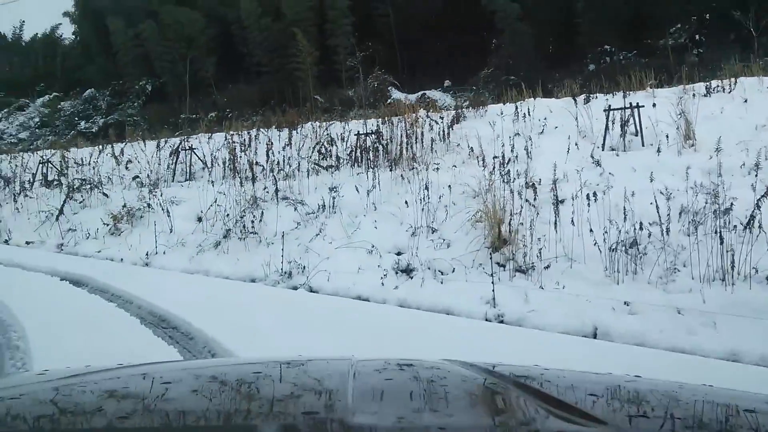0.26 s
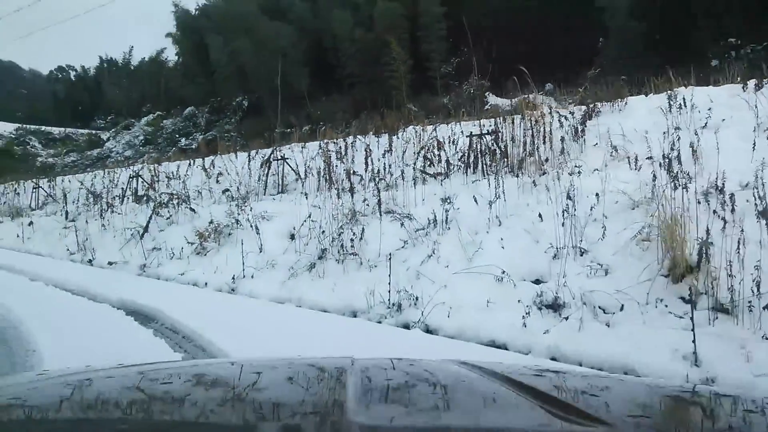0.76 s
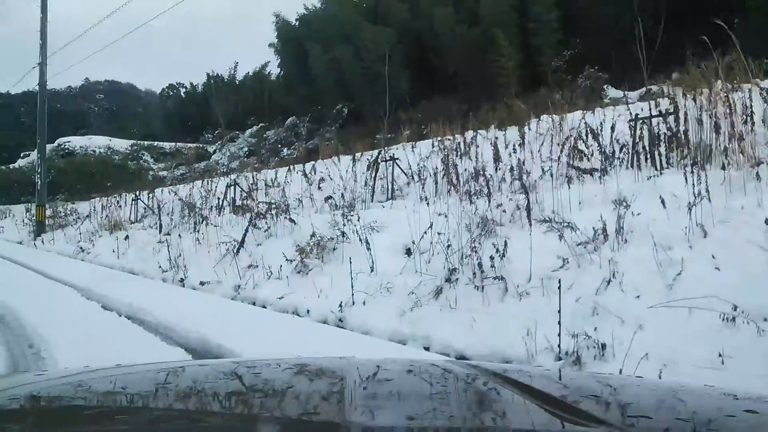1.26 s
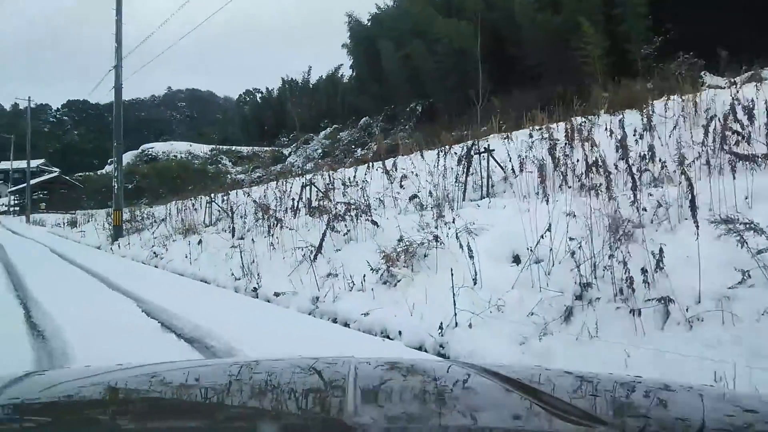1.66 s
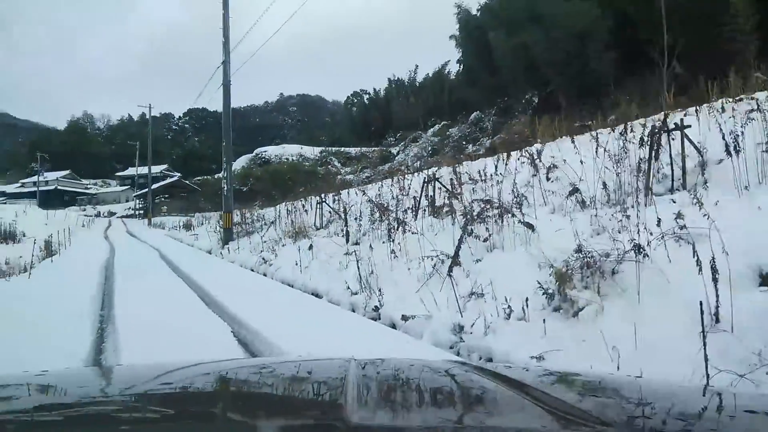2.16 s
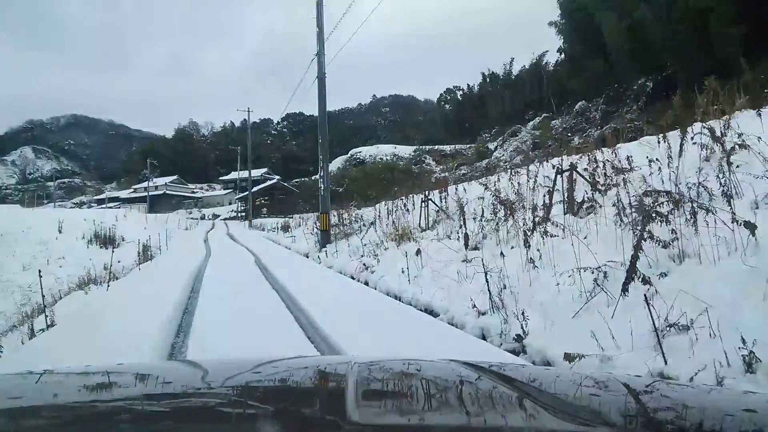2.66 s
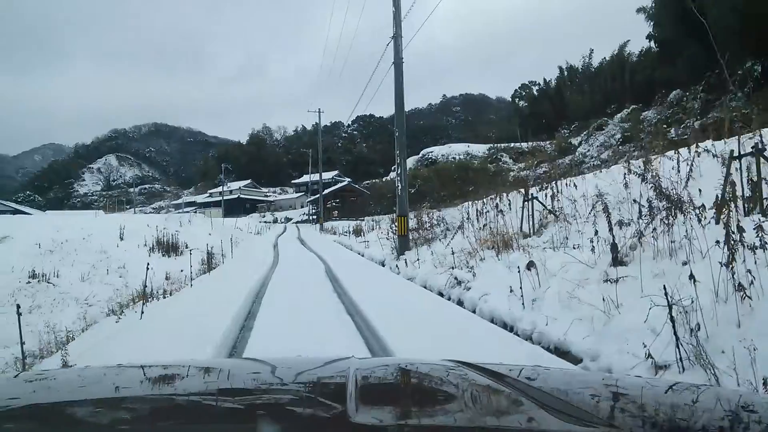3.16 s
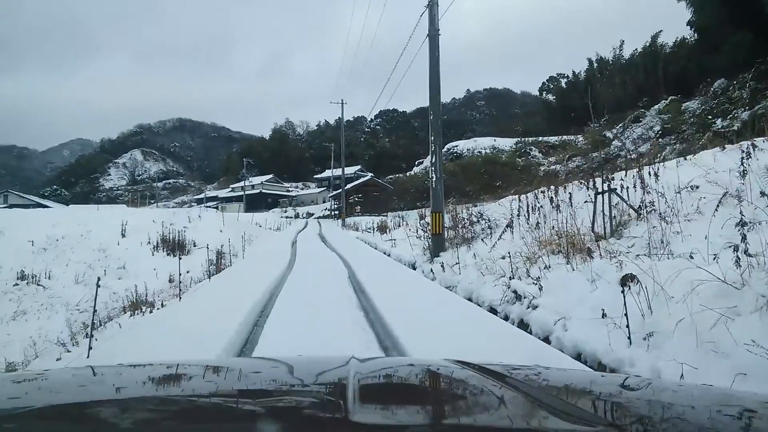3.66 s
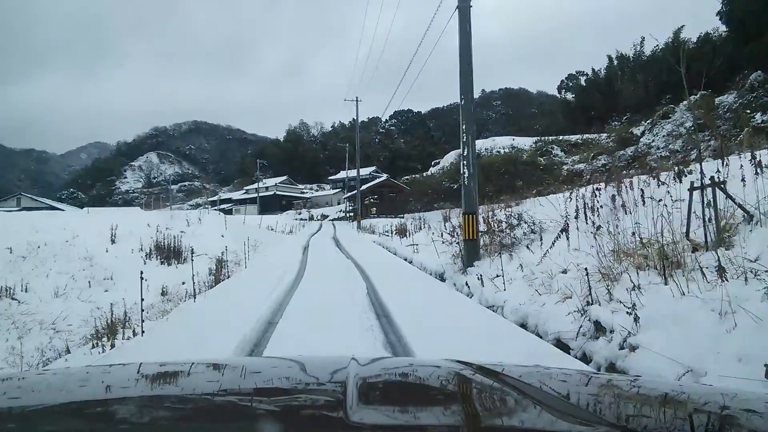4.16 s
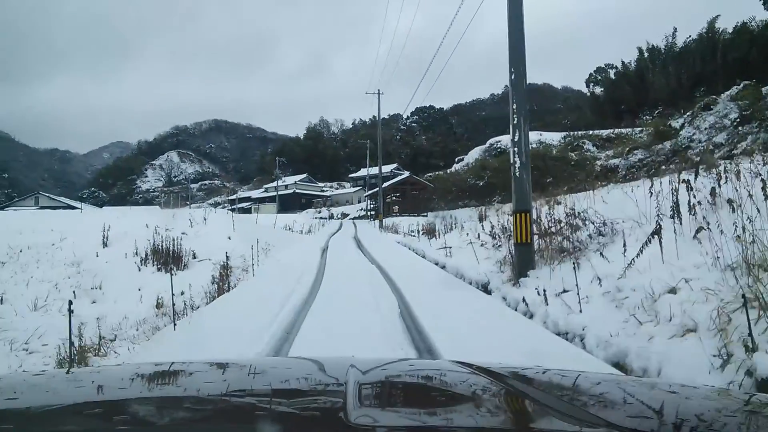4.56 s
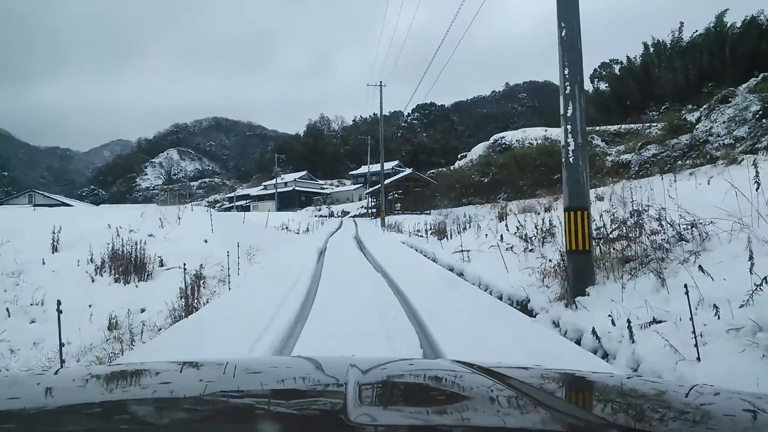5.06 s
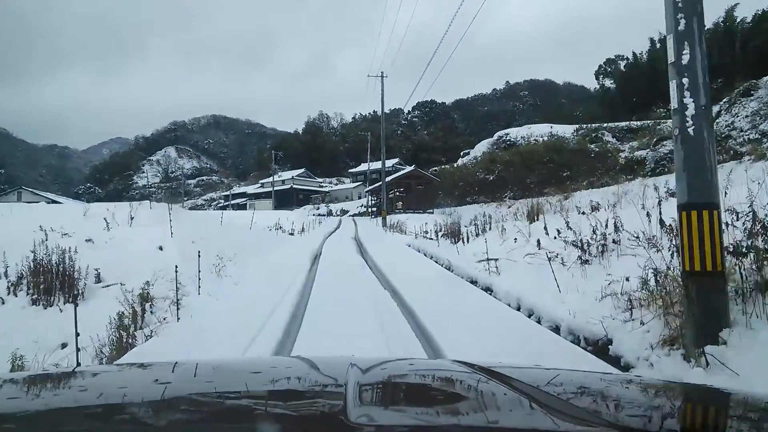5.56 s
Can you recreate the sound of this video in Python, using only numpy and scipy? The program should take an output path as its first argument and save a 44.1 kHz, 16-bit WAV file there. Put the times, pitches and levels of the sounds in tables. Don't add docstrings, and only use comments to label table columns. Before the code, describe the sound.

Dashboard-level cabin sound: boomy engine hum, soft tyre rumble on snow, muffled lumps knocking below, plastic creaks, and revs climbing at the end.

```python
import sys
import numpy as np
from scipy import signal
from scipy.fft import rfft, irfft, next_fast_len
from scipy.io import wavfile
from scipy.ndimage import uniform_filter1d, map_coordinates

SR = 44100
rng = np.random.default_rng(int(sys.argv[2]) if len(sys.argv) > 2 else 0)


def volts_from_db(level):
    exponent = np.asarray(level, float) / 20
    return 10 ** exponent


def master(y):
    cut = np.clip(np.atleast_2d(y).T, -1, 1)
    pcm = np.round(cut * 32767)
    wavfile.write(sys.argv[1], SR, pcm.astype(np.int16))


N = 255780
TIME_S = np.arange(N) / SR

# t/s, f/Hz
SHAFT = [(0.0, 15.91), (0.44, 15.97), (0.58, 16.19), (0.87, 16.03), (1.16, 16.37), (1.45, 16.3),
         (1.74, 16.47), (2.32, 16.99), (2.9, 18.09), (3.05, 18.37), (3.34, 18.0), (3.77, 18.31),
         (4.21, 18.7), (4.35, 18.29), (4.79, 18.81), (5.08, 19.38), (5.37, 19.83), (5.8, 20.77)]
IDLE_HZ = 16
# t/s, level/dB re full
LOAD = [(0.0, -19.5), (0.3, -14.5), (0.6, -8.5), (0.9, -4), (1.6, -3), (2.3, -6), (2.8, -11), (3.6, -11.5),
        (4.2, -9.5), (4.5, -15), (5.0, -3.5), (5.4, 1.5), (5.8, 4)]
# t/s, lead/rad
WINDUP = [(0, 2.19), (.3, 1.704), (.6, 1.08), (1.0, 0.58), (1.4, 0.11), (1.8, -0.487), (2.2, 1.11),
          (2.6, 0.64), (3.0, 0.71), (3.5, 0.243), (4.2, 0.366), (4.6, 0.285), (5.0, -0.864), (5.4, -0.46),
          (5.8, -0.48)]

STRONG_ORDERS = [8, 13, 18, 21, 22, 23, 24, 25, 26, 27, 48, 56]
STRONG_DB = [-53, -51.5, -57.5, -61.5, -60.5, -66.5, -58.5, -70, -59, -55, -66.5, -65.5]
STRONG_FOLLOWS = [.3, 1, 1, .7, .7, 1, 1, 1, .8, .85, 1, 1]
STRONG_RAD = [0, 1, 2.4, 0, 2, 0, 5, 3.2, 1.2, 5.1, 0, 0]
STRONG_SLIDES = [0, 0, 0, 3.4, 4, 4, 1.5, .6, .6, -2.5, 0, 0]
STIFF_HZ, SHAKE_RAD, FLUTTER_DB = 1.7, .25, 1.8
UNEVEN, UNEVEN_RAD = .2, 1.6
# f/Hz, width/Hz, level/dB
BODY = [(132, 16.2, 10.5), (234.26, 11.95, 20.5), (350.2, 52.4, 19), (423.13, 46.34, 29), (1007, 228, 16)]
# t/s, half length/s, lowest order loss/dB, gear gain/dB
SLACK = [
    (0.367, 0.148, 23.5, -4.5),
    (0.271, 0.079, 1.5, 35.5),
    (1.35, 0.234, 4.5, -3),
    (1.858, 0.0283, 11, -6),
    (3.584, 0.2, 22, 11.5),
    (4.44, 0.29, 24, 1.5),
]
SHIFT_ORDERS = [27, 26, 25, 25, 24, 27, 24, 8, 8, 56, 48, 26, 13, 18, 48, 13, 23]
# t/s, half length/s, level/dB
SHIFTS = [(0.086, 0.183, -7.5), (1.957, 0.27, -9), (2.2, 0.28, 9), (3.4, .3, -2), (3.446, 0.228, -9.5),
          (3.63, 0.214, -13.5), (5.417, 0.33, -0.5), (1.494, 0.033, 3.5), (1.691, 0.046, -7),
          (5.716, 0.275, -16), (5.36, 0.096, -17), (0.232, 0.082, -8.5), (3.54, 0.65, -1.5),
          (5.25, 0.13, -5.5), (4.98, 0.125, 9.5), (4.44, 0.31, 3.5), (3.09, 0.163, 6)]

WEAK_ORDERS = [5, 6, 10, 11, 12, 14, 15, 16, 17, 19, 20, 29, 30, 31, 32]
WEAK_DB = [10.5, 1, 5, 9.5, 7, 4.5, 8, 7.5, 8.5, -2, 5, -6, 1, 1, 6.5]
GEAR_ORDERS = [37, 40, 50, 51, 53, 54, 60, 64]
GEAR_DB = [10.5, -4.5, 13, -17, -9, 11, -13.5, -19]
DRIFT_DB, DRIFT_RAD = 4.5, .9
DRONE_DB, DRONE_FOLLOWS = -30, 0.5744
NOISY_DB, NOISY_FOLLOWS, NOISY_TOP_DB = -3.5, -.62, 2
KNOCK_RAD, KNOCK_RAD_PER_HZ = 2.2, .38
DEEP_DB, DEEP_PEAK_DB, DEEP_AT_HZ, DEEP_WIDTH_HZ, DEEP_WAKES_HZ = -11.5, 13.5, 2.107, 4.7, 1.91
# f/Hz, width/Hz, level/dB
CABIN = [(146.4, 25.26, 11.5), (219.6, 12, -7), (350.4, 26.4, 1.5), (423.34, 22.4, 9.5), (441.1, 31.3, 16),
         (548.5, 110.3, 4), (758, 14, -3), (945.5, 81.6, 1), (1366.8, 48.8, 12.5), (1596, 76.5, 2),
         (1878, 177, -0.5), (2633, 176.6, 6.5)]
# f/Hz, level/dB
BULKHEAD = [(40, -21.5), (100, -18.5), (200, -2.5), (400, -1), (700, -11), (1200, -18.5), (2000, -28),
            (3300, -44.5), (6000, -49)]

# f/Hz, level/(dB per Hz)
RUMBLE = [(12, -52.5), (20, 1.5), (96, 2), (115, 5), (150, -30.5), (250, -120)]
RUMBLE_DB, RUMBLE_SWING_DB = -62.5, 2.5
# t/s, peak level/dB, half length/s
RUTS = [(0, -47, 0.069), (0.637, -46, 0.06), (0.784, -44, 0.0354), (1.072, -48, 0.13), (1.478, -47, 0.055),
        (1.942, -50, 0.15), (2.213, -43.5, 0.118), (2.5, -46.5, 0.187), (2.673, -44, 0.103),
        (2.834, -61, .06), (3.05, -48, 0.108), (3.24, -50, 0.124), (3.87, -57.5, 0.12), (4.146, -53, 0.054),
        (4.6, -58.5, 0.086), (5.1, -49.5, 0.067), (5.305, -49.5, 0.066), (5.703, -49.5, 0.118)]
# f/Hz, level/(dB per Hz)
TREAD = [(450, -24.5), (700, 3.5), (1500, 5.0), (3500, 7.5), (5000, -4.0)]
CRUNCH_DB, CRUNCH_DB_PER_HZ, CRUNCH_SWING_DB, TREAD_PATCHY_DB = -45, 1.1621, .9, 1.4
# f/Hz, level/(dB per Hz)
SLUSH = [(1470, -20.5), (2500, 0), (2720, -6.5), (3270, -10.5), (4250, -4.5), (4660, -10), (6740, -7),
         (9240, -5), (15700, -4.5)]
# t/s, peak level/dB, rise/s, fall to -10 dB/s
SPRAYS = [(0, -64.5, .1, 0.13), (.55, -66.5, 0.28, 0.8), (.8, -61, 0.066, 0.0856), (1.57, -66.5, .12, 0.36),
          (1.92, -63, 0.068, 0.18), (2.3, -67, 0.21, -0.6), (2.8, -53.5, 0.268, 0.34),
          (3.12, -56.5, 0.067, 0.75), (3.43, -49.5, 0.155, 0.2), (3.8, -62, .15, -0.97),
          (4.08, -61.5, 0.18, 0.54), (4.56, -56, .06, 0.25), (4.74, -46.5, 0.115, 0.21),
          (4.88, -60.5, 0.085, 0.34), (5.17, -60.5, 0.11, -0.09), (5.55, -56.5, 0.1, -0.03),
          (5.8, -56, 0.226, .1)]
DAMP_DB, WET_DB, WET_FROM_S = -79, -66.5, 2.46
# f/Hz, level/(dB per Hz)
FAN = [(1470, -33.5), (2500, -39.5), (2660, -14), (3380, -27), (3620, -4), (4490, -12.5), (5200, -8),
       (5840, -4.5), (6820, -23.5), (14300, -10), (15800, -19.5)]
FAN_DB, FAN_PATCHY_DB = -70, 1.6
# f/Hz, level/dB
WHISTLES = [
    (5923, -86),
    (8922, -86),
    (9890, -83),
]

# t/s, peak level/dB, ring f/Hz
LUMPS = [(.041, -27, 433.6), (.129, -31, 327), (.248, -32, 449), (.39, -31.5, 331.5), (.451, -22.5, 418.8),
         (.581, -37.5, 441), (4.938, -22, 407.6), (5.2, -31, 411), (2.642, -26, 432), (2.923, -36.5, 434),
         (3.035, -42, 430), (3.314, -21, 440), (3.421, -33.5, 434), (3.531, -25.5, 430),
         (3.641, -21.5, 427.5), (3.752, -29, 437), (3.859, -27, 422), (4.13, -28.5, 367.3),
         (4.184, -22, 447), (4.4, -25.5, 380.6), (4.508, -27, 426), (4.564, -38, 455), (4.715, -18, 435.7),
         (4.778, -20, 407.6), (4.83, -31, 418), (4.883, -38, 402)]
# t/s, peak level/dB, ring f/Hz
CRUST = [(0.177, -32, 974), (0.232, -38.5, 785), (0.5, -26, 600), (0.572, -25.5, 579), (1.067, -27.5, 610),
         (1.193, -30, 596), (1.241, -24.5, 590), (1.342, -28.5, 610.6), (1.473, -33.5, 573),
         (1.83, -21, 583), (1.883, -30, 639), (1.988, -39, 575), (2.045, -30.5, 595), (2.342, -42.5, 980),
         (2.431, -42, 750), (2.52, -26, 672), (2.874, -23, 607), (2.983, -28.5, 928), (3.311, -33, 759),
         (3.405, -27, 591), (3.517, -36.5, 605), (3.804, -26.5, 667), (3.942, -28, 719),
         (4.043, -19.5, 577.4), (4.103, -28, 750), (4.17, -30, 1206), (4.206, -30, 737),
         (4.22, -31.5, 1220), (4.291, -34.5, 741), (4.367, -33.5, 719), (4.515, -38, 1362),
         (4.574, -28, 1360), (4.695, -21.5, 746), (4.874, -26.5, 1390), (4.964, -23.5, 937),
         (5.065, -32, 930), (5.12, -26.5, 932), (5.266, -33, 730), (5.378, -37, 723), (5.465, -24, 591),
         (5.521, -31.5, 564)]
# t/s, peak level/dB, ring f/Hz
THUDS = [(0.14, -33.5, 317.7), (0.229, -42, 303.4), (0.309, -41.5, 212), (0.372, -36, 214),
         (1.53, -28, 286.2), (1.882, -29.5, 213.6), (1.999, -34.5, 271.4), (2.178, -35.5, 232.3),
         (2.552, -30.5, 238.7), (2.829, -25.5, 227.5), (2.996, -33.5, 236), (3.159, -28, 228.9),
         (3.431, -24, 235), (3.518, -35, 237.6), (3.602, -32.5, 236.4), (4.088, -30.5, 234),
         (4.251, -28, 276.6), (4.419, -34.5, 291), (4.556, -30, 247.6), (4.659, -34.5, 251),
         (5.002, -29.5, 247.8), (5.092, -26.5, 242.9), (5.453, -25.5, 256.4)]
LUMP_T60_S, CRUST_T60_S, THUD_T60_S, SOFT_S = 0.0417, 0.0356, 0.0873, .011
LUMP_DB, CRUST_DB, THUD_DB = 0, -4, -6

# t/s, peak level/dB, f/Hz, t60/s
CHIRPS = [
    (0.269, -62, 2280, .03),
    (4.428, -54, 2000, .03),
    (3.68, -55, 5350, 0.057),
    (3.7517, -50.5, 5340, 0.068),
]
# t/s, dull level/dB, bright level/dB, ring f/Hz
TICKS = [(0.2706, -50, -77.5, 4753), (0.467, -57, -65, 3180), (0.522, -54.5, -73.5, 3690),
         (0.794, -60.5, -58.5, 2960), (1.064, -64.5, -56.5, 2960), (2.4625, -52.5, -52, 2920),
         (3.04, -53, -50.5, 5450), (3.619, -48.5, -40.5, 2820), (3.6759, -66.5, -48.5, 5330),
         (3.749, -57.5, -41.5, 5210), (3.8693, -58.5, -54.5, 4560), (3.912, -48, -50, 2924),
         (3.9317, -66.5, -64, 2980), (4.2462, -42, -42, 3430), (4.2866, -63, -44.5, 3400),
         (4.515, -48, -48, 3057), (4.8262, -51, -41, 3590), (4.8658, -52, -44, 3540),
         (4.9215, -67.5, -49.5, 3220), (5.085, -56, -54.5, 2980), (5.1102, -47, -43.5, 3307),
         (5.1363, -53, -55, 3000), (5.4417, -48, -39.5, 4703), (5.493, -56, -43, 3010),
         (5.7217, -52.5, -49.5, 4580), (5.76, -57, -60, 4380)]
TICK_T60_S, TICK_T60_S_PER_DB = .062, .0012
# t/s, dull level/dB, bright level/dB
SNAPS = [
    (0.9936, -53, -53.5),
    (1.872, -48, -64.5),
    (2.569, -54, -63.5),
    (2.6583, -44, -49),
    (2.7041, -40, -60.5),
    (2.7458, -53.5, -57.5),
    (2.798, -50, -51.5),
    (4.4849, -48.5, -58.5),
    (4.742, -42.5, -34.5),
]
SNAP_HZ, SNAP_T60_S = 4454, 0.0223
# f/Hz, width/Hz, level/dB
TRIM = [(2806, 350, 8), (3542, 350, 6.5), (4694, 620, 8.5), (5815, 300, 0)]
# f/Hz, level/dB
DULL = [(1400, -38.0), (2400, 5.0), (3500, 2.5), (6000, 1.5), (8000, -13.5)]
# f/Hz, level/dB
BRIGHT = [(5000, -11.0), (8000, 0.5), (11000, -2.5), (15000, -8.0)]
# t/s, peak level/dB, centre f/Hz
CRACKS = [(3.6785, -37.5, 9220), (3.7517, -27, 11170), (3.9135, -41, 14520), (4.2477, -33.5, 8820),
          (4.2892, -35, 10020), (4.5166, -34.5, 14200), (4.8678, -37, 7860), (4.923, -30.5, 11470),
          (5.1146, -33.5, 14260), (5.445, -30.5, 9100), (5.4966, -36.5, 7690), (5.7224, -41.5, 13010)]
CRACK_T60_S, CRACK_WIDTH_HZ, CRACK_DB = 0.0284, 1300, -4.5
# t/s, peak level/dB, centre f/Hz
CLACKS = [(0.2713, -40, 4700), (2.4654, -45.5, 2985), (2.6586, -38, 4573), (2.7055, -42.5, 4560),
          (2.7437, -41.5, 4580), (3.041, -48, 4680), (3.6197, -39.5, 3882), (3.915, -34.5, 3267),
          (4.2476, -41.5, 3430), (4.249, -31.5, 5068), (4.5166, -39.5, 2997), (5.112, -43, 4410),
          (4.8263, -39, 3554), (4.8693, -35.5, 3490), (5.445, -41, 4730), (5.7224, -41.5, 4840)]
CLACK_T60_S, CLACK_WIDTH_HZ, CLACK_DB = 0.0427, 730, -5.5

# t/s, peak level/dB
BUMPS = [
    (.8195, -14.5),
    (4.015, -28),
    (4.183, -24),
]
# f/Hz, level/dB, t60/s
DASH = [(300, -14, .06), (422, -3.5, .07), (570, -5, .055), (800, -13, .05), (1010, -12, .05),
        (1220, -14, .05), (1500, -15, .04), (1720, -20, .035)]
# t/s, f/Hz, level/dB
PUMP = [
    (3.7, 698, -73.5),
    (4.0, 708, -48),
    (4.2, 727.6, -39.5),
    (4.45, 722.3, -47),
    (4.55, 741, -46),
    (4.7, 738.3, -39),
    (4.85, 758, -57),
    (5.0, 779, -43.5),
    (5.22, 789.7, -49.5),
    (5.35, 800, -74),
]
TOP_HZ = 15830


def unit(x):
    return x / np.sqrt(np.mean(x ** 2) + 1e-20)


def along(points, hz):
    f, v = np.transpose(points)
    return np.interp(np.log(hz + 1), np.log(f + 1), v)


def curves(rows):
    s, *cols = np.transpose(rows)
    return [np.interp(TIME_S, s, c) for c in cols]


def wobble(rate_hz):
    coarse = np.arange(0, N + 32, 32)
    knots = rng.standard_normal(int(N * rate_hz / SR) + 4)
    return np.interp(np.arange(N), coarse, map_coordinates(knots, [coarse * rate_hz / SR]))


def phase(hz):
    return 2 * np.pi * np.cumsum(hz) / SR


def filtered(x, response):
    m = next_fast_len(N + SR // 2)
    return irfft(rfft(x, m) * response(np.fft.rfftfreq(m, 1 / SR)), m)[:N]


def patchy(x, depth_db, window=256, bins=5, frames=4):
    z = signal.stft(x, nperseg=window)[2]
    field = uniform_filter1d(rng.standard_normal(z.shape), bins, axis=0)
    field = uniform_filter1d(field, frames, axis=1)
    return signal.istft(z * volts_from_db(depth_db * unit(field)), nperseg=window)[1][:N]


def noise(spectrum, patchy_db):
    flat = patchy(rng.standard_normal(N + 512), patchy_db, 512, 6, 14)
    return unit(filtered(flat, lambda f: volts_from_db(along(spectrum, f))))


def swells(rows, order):
    power = 0
    for s, db, rise_s, fall_s in rows:
        away = np.maximum((s - TIME_S) / abs(rise_s), (TIME_S - s) / abs(fall_s))
        power = power + volts_from_db(2 * db - 20 * away ** order)
    return np.sqrt(power)


def add_at(out, s, sound):
    out[round(s * SR):][:len(sound)] += sound


def resonances(f, modes):
    return sum(volts_from_db(db) * 1j * f * w / (c * c - f * f + 1j * f * w) for c, w, db in modes)


def cabin(f):
    return volts_from_db(along(BULKHEAD, f)) * (1 + resonances(f, CABIN))


def crank():
    return phase(curves(SHAFT)[0])


def revs():
    return curves(SHAFT)[0] - IDLE_HZ


def strong_orders():
    turn, shaft_hz = crank(), curves(SHAFT)[0]
    load_db, ahead_rad = curves(LOAD)[0], curves(WINDUP)[0]
    stiff = np.clip(revs() / STIFF_HZ, 0, 1)
    f = np.arange(1300)
    peaks = sum(volts_from_db(2 * db) / (1 + (2 * (f - c) / w) ** 2) ** 2 for c, w, db in BODY)
    body_db = 10 * np.log10(1 + peaks)
    lines = []
    for k, db, share, angle, slide in zip(STRONG_ORDERS, STRONG_DB, STRONG_FOLLOWS, STRONG_RAD, STRONG_SLIDES):
        firing = 20 < k < 30
        level_db = db + 2.8 + share * load_db + np.interp(k * shaft_hz, f, body_db)
        for shifted, (s, half_s, shift_db) in zip(SHIFT_ORDERS, SHIFTS):
            if shifted == k:
                level_db = level_db + shift_db * np.exp(-((TIME_S - s) / half_s) ** 2)
        level_db = level_db + (1 if firing else 2) * wobble(9) + FLUTTER_DB * (k < 20) * wobble(22)
        shake_rad = (2.4 if k in (13, 18, 48, 56) else .8) * SHAKE_RAD * wobble(8)
        lead_rad = (k - 25.5) * ahead_rad * firing
        lines.append(volts_from_db(level_db) * np.sin(k * turn + lead_rad + angle + slide * stiff + shake_rad))
    uneven = 1 + UNEVEN * np.cos(turn / 2 - UNEVEN_RAD)
    lost_db, freed_db = sum(np.outer(db, np.exp(-((TIME_S - s) / half_s) ** 4)) for s, half_s, *db in SLACK)
    lowest = volts_from_db(-lost_db) * lines[0]
    gear = volts_from_db(freed_db) * lines[10]
    return lowest + sum(lines[1:3]) + uneven * sum(lines[3:10]) + gear + lines[11]


def engine():
    turn, speed_hz = crank(), revs()
    load_db, = curves(LOAD)
    drone_db = DRONE_DB + DRONE_FOLLOWS * load_db
    noisy_db = np.minimum(NOISY_DB + NOISY_FOLLOWS * load_db, NOISY_TOP_DB)
    lines = 0
    for k, db in zip(WEAK_ORDERS + GEAR_ORDERS, WEAK_DB + GEAR_DB):
        angle = rng.uniform(0, 2 * np.pi) + DRIFT_RAD * wobble(7)
        lines = lines + volts_from_db(db + DRIFT_DB * wobble(6)) * np.sin(k * turn + angle)
    knock_angle = turn - (KNOCK_RAD + KNOCK_RAD_PER_HZ * speed_hz - curves(WINDUP)[0])
    turn_count = np.round(knock_angle / (2 * np.pi)).astype(int)
    strength = volts_from_db(rng.uniform(-5, 4, turn_count.max() + 2))[turn_count]
    knock = strength * np.exp(2.5 * (np.cos(knock_angle) - 1)) * rng.standard_normal(N)
    dull_knock = filtered(knock, lambda f: 1 / (1 + (f / 600) ** 4) / (1 + (260 / (f + 1)) ** 4))
    rough = unit(filtered(.5 * rng.standard_normal(N) + .75 * dull_knock, cabin))
    drone = volts_from_db(-5.5) * unit(filtered(lines, cabin)) + volts_from_db(noisy_db) * rough
    width_hz = np.where(speed_hz < DEEP_AT_HZ, DEEP_WAKES_HZ, DEEP_WIDTH_HZ)
    waking = np.exp(-((speed_hz - DEEP_AT_HZ) / width_hz) ** 2)
    deep_db = DEEP_DB + DEEP_PEAK_DB * waking + 2 * wobble(2.72)
    floor_pan = filtered(drone, lambda f: 1 / (1 + (f / 310) ** 8))
    return volts_from_db(drone_db - 3.5) * (drone + (volts_from_db(deep_db) - 1) * floor_pan)


def rumble():
    ruts = swells([(s, db, half_s, half_s) for s, db, half_s in RUTS], order=1)
    steady = volts_from_db(RUMBLE_DB + RUMBLE_SWING_DB * wobble(6.917))
    return np.hypot(ruts, steady) * noise(RUMBLE, patchy_db=1.0)


def crunch():
    tread = patchy(noise(TREAD, TREAD_PATCHY_DB), depth_db=1.8)
    level_db = CRUNCH_DB + CRUNCH_DB_PER_HZ * revs() + CRUNCH_SWING_DB * wobble(9)
    return volts_from_db(level_db - 1.5 + .5 * wobble(14)) * unit(filtered(tread, cabin))


def slush():
    wet_db = np.interp(TIME_S - WET_FROM_S, [-.01, .01], [DAMP_DB, WET_DB])
    level = np.hypot(swells(SPRAYS, order=2), volts_from_db(wet_db))
    return level * volts_from_db(.8 * wobble(10)) * noise(SLUSH, patchy_db=1.5)


def fan():
    return volts_from_db(FAN_DB) * noise(FAN, FAN_PATCHY_DB)


def panel(x):
    buzz = filtered(x, lambda f: np.exp(-((f - 1375) / 70) ** 2))
    buzz_db = np.clip(3 * (curves(SHAFT)[0] - 18), -7, 0)
    return x + (volts_from_db(buzz_db) - 1) * buzz


def whistles():
    return sum(volts_from_db(db + 3 * wobble(6)) * np.sin(phase(hz + 12 * wobble(30))) for hz, db in WHISTLES)


def snow():
    out, t = np.zeros(N + SR), np.arange(SR // 8) / SR
    onset = 7 * (1 - np.exp(-t / SOFT_S)) ** 2
    for rows, t60, gain_db in ((LUMPS, LUMP_T60_S, LUMP_DB), (CRUST, CRUST_T60_S, CRUST_DB),
                               (THUDS, THUD_T60_S, THUD_DB)):
        for s, db, hz in rows:
            add_at(out, s, volts_from_db(db + gain_db - 60 * t / t60) * onset * np.sin(2 * np.pi * hz * t))
    return out[:N]


def chirps():
    out, t = np.zeros(N + SR), np.arange(SR // 4) / SR
    beat = np.cos(2 * np.pi * 33 * (t - .003))
    for s, db, hz, t60 in CHIRPS:
        tones = beat * np.sin(2 * np.pi * hz * t) + 0.184 * np.sin(2 * np.pi * 0.76 * hz * t)
        add_at(out, s, volts_from_db(db + 4 - 60 * (t / t60) ** 2) * tones)
    return out[:N]


def trim():
    ring, low, high = np.zeros((3, N + SR))
    t = np.arange(SR // 4) / SR
    ticks = [(*row, TICK_T60_S - TICK_T60_S_PER_DB * (max(row[1:3]) + 45)) for row in TICKS]
    snaps = [(*row, SNAP_HZ, SNAP_T60_S) for row in SNAPS]
    for s, low_db, high_db, hz, t60 in ticks + snaps:
        tail = 5.52 * t60 * volts_from_db(-60 * t / 0.411)
        fade = (volts_from_db(-60 * t / t60) + tail) * (1 - np.exp(-t / 0.00289))
        ring_fade = volts_from_db(low_db + 1 - 60 * t / (.7 * t60)) * (1 - np.exp(-t / .001))
        add_at(ring, s, ring_fade * np.sin(2 * np.pi * hz * t))
        add_at(low, s, volts_from_db(low_db + 4.5) * fade * rng.standard_normal(len(t)))
        add_at(high, s, volts_from_db(high_db + 2.0) * fade * rng.standard_normal(len(t)))
    low = low[:N] * volts_from_db(3 * wobble(350))
    high = high[:N] * volts_from_db(3 * wobble(350))
    dull = filtered(low, lambda f: volts_from_db(along(DULL, f)) * (0.403 + volts_from_db(-9) * resonances(f, TRIM)))
    bright = filtered(high, lambda f: volts_from_db(along(BRIGHT, f)))
    return ring[:N] + patchy(dull, depth_db=2.5) + bright


def cracks():
    out, t = np.zeros(N + SR), np.arange(SR // 20) / SR
    onset = 1 - np.exp(-t / 0.00092)
    for rows, t60, width_hz, gain_db in ((CRACKS, CRACK_T60_S, CRACK_WIDTH_HZ, CRACK_DB),
                                         (CLACKS, CLACK_T60_S, CLACK_WIDTH_HZ, CLACK_DB)):
        for s, db, hz in rows:
            spread = rng.standard_normal(8)
            modes_hz = np.clip(hz + width_hz * spread, 2500, 15500)
            modes = np.sin(2 * np.pi * np.outer(modes_hz, t) + 9 * spread[:, None]).sum(axis=0)
            add_at(out, s, volts_from_db(db + gain_db - 10 - 60 * t / t60) * onset * modes)
    return out[:N]


def bumps():
    blows, t = np.zeros(N + SR), np.arange(SR // 8) / SR
    for s, db in BUMPS:
        dullness = 1.15 - (db + 15) / 15
        ring = sum(volts_from_db(level_db * dullness - 60 * t / t60) * np.sin(2 * np.pi * hz * t)
                   for hz, level_db, t60 in DASH)
        add_at(blows, s, -volts_from_db(db + 3) * (1 - np.exp(-t / .006)) * ring)
    return blows[:N]


def pump():
    hz, db = curves(PUMP)
    return volts_from_db(db - 2.5 + 3.8 * wobble(15)) * np.sin(phase(hz + 4 * wobble(13)))


def scene():
    road = rumble() + crunch() + slush() + fan()
    car = strong_orders() + panel(engine() + road) + whistles()
    knocks = snow() + chirps() + trim() + cracks() + bumps()
    return (car + knocks + pump())[None]


def top_cut(x):
    return signal.sosfilt(signal.butter(12, 16710, fs=SR, output="sos"), x)


def record(dry):
    mix = filtered(dry[0], lambda f: f < TOP_HZ)[None]
    return top_cut(mix)


dry = scene()
out = record(dry)
master(out)
```